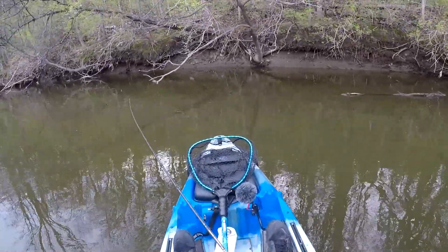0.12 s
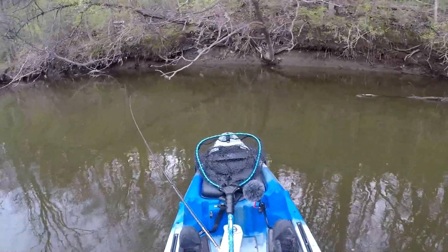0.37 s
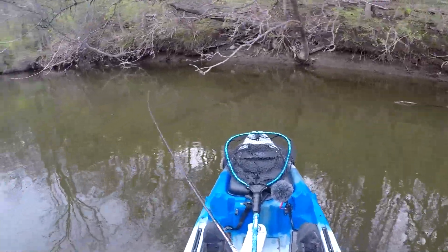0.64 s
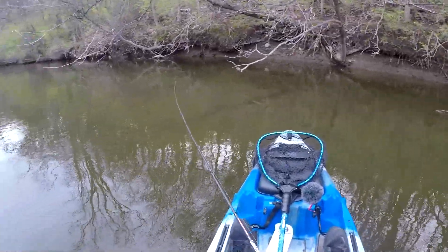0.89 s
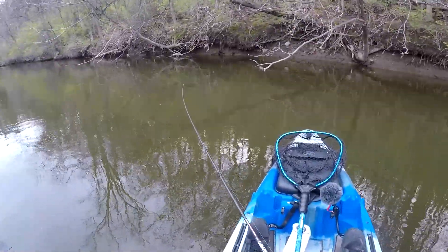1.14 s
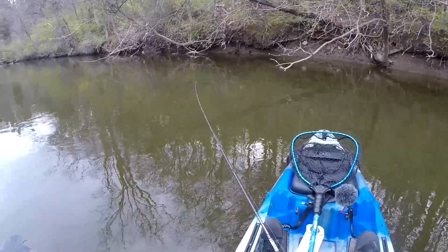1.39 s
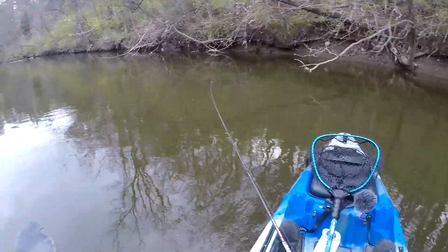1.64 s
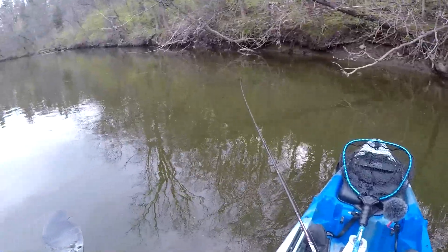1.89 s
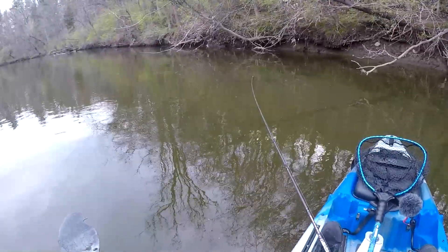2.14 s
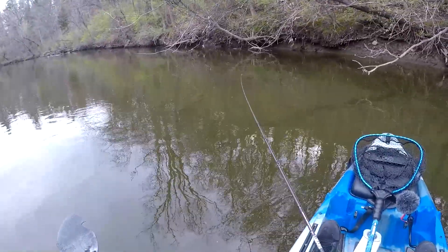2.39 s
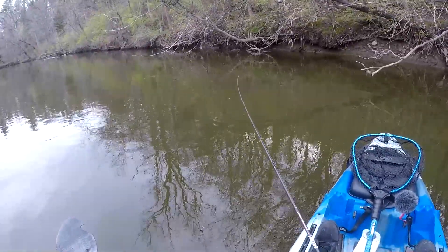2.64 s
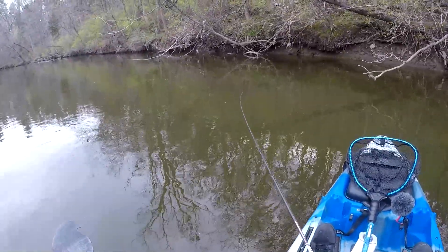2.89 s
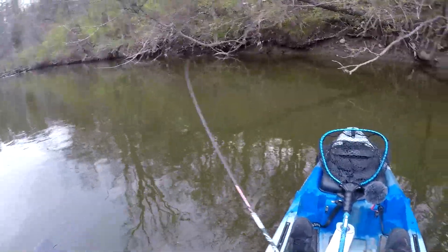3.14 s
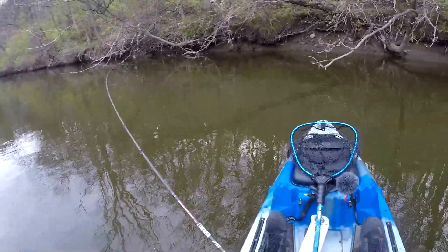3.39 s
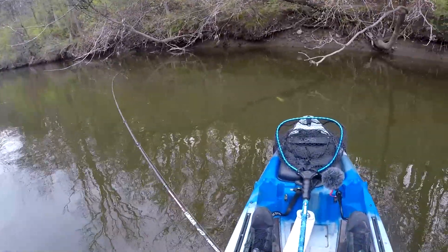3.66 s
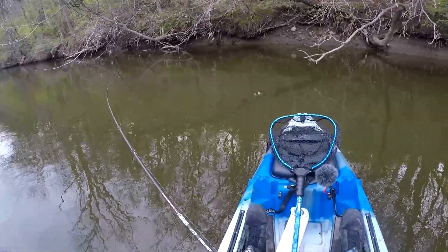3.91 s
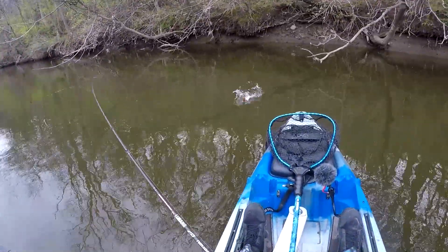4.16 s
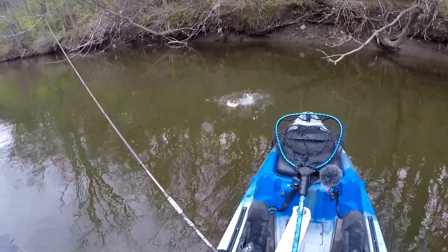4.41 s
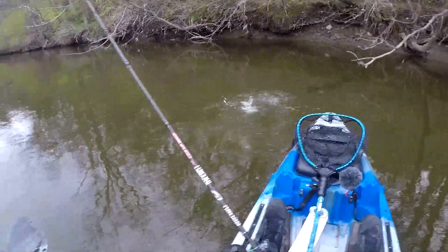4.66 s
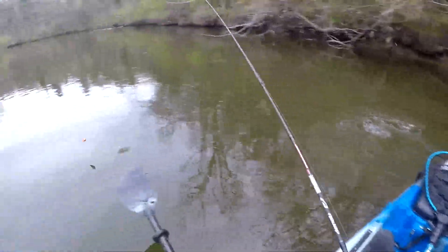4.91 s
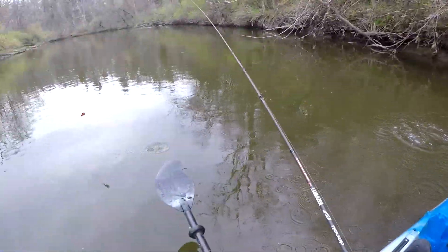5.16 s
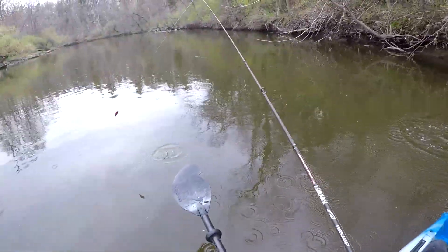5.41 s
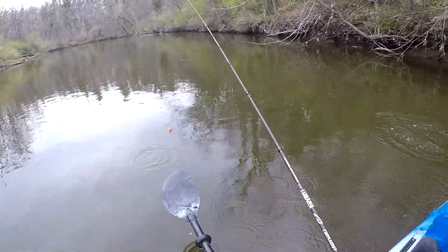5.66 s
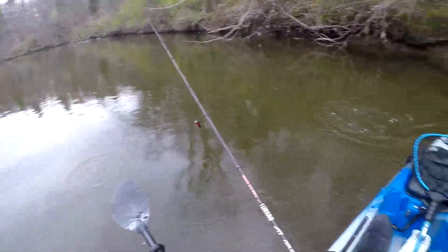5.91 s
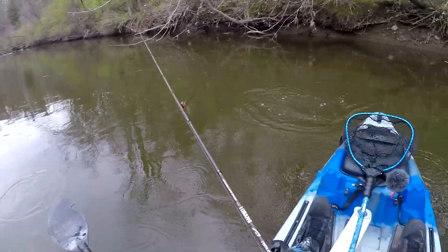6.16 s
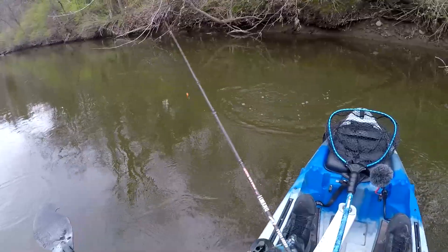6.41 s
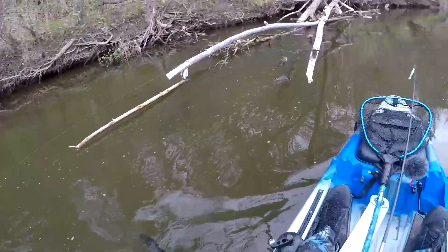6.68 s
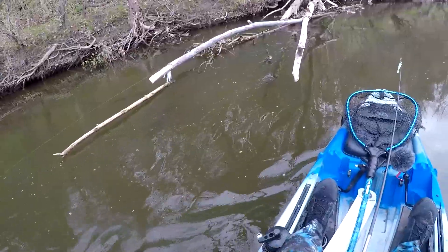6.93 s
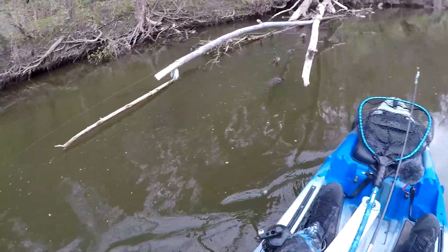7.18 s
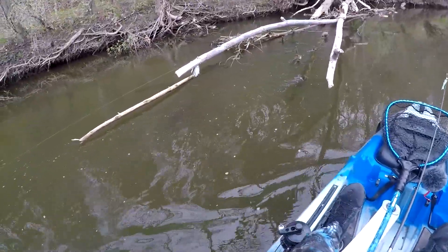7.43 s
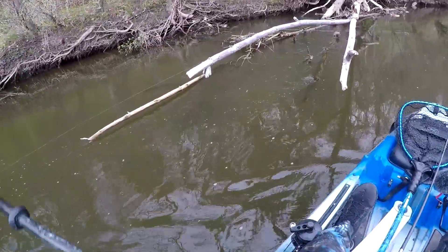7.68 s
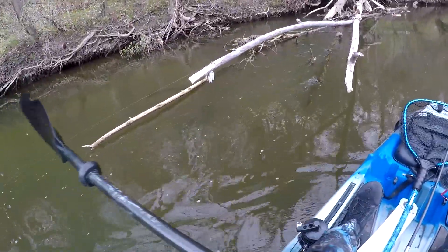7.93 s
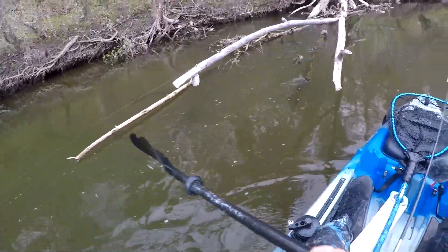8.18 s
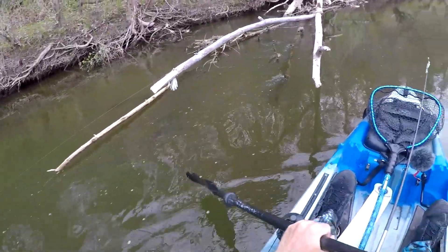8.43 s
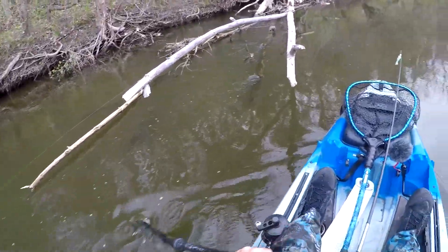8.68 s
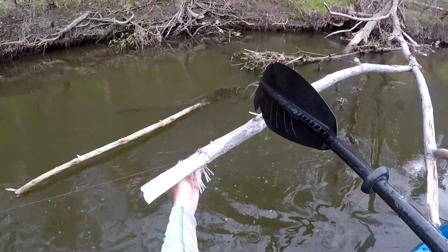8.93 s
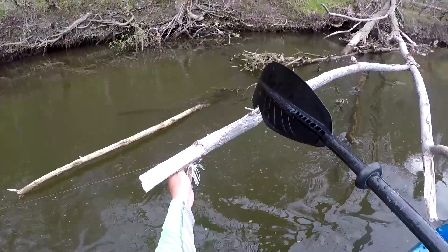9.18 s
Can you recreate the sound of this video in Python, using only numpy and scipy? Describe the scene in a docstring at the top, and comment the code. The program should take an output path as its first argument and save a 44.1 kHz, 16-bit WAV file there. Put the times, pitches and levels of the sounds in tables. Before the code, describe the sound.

Faint birds and far traffic over still water, a light splash, then an abrupt change to close plastic kayak thumps, bubbling slosh and low rumbling.

```python
"""Far traffic rumble, river hiss, faint frogs and songbirds: shaped noise and swept sines with an echo of trees.
A plastic kayak drifts; dull knocks ring its hull as decaying modes, and a fish splashes at the end of a line.
Then the hull rocks, judders along a sunken branch and sloshes under the paddle, right below the microphone.
Water is swarms of rising bubble tones, flaring bands of hiss and short noise bursts for drops."""
import sys
import numpy as np
from scipy import signal
from scipy.fft import rfft, irfft, next_fast_len
from scipy.io import wavfile
from scipy.ndimage import uniform_filter1d

SR = 44100
rng = np.random.default_rng(int(sys.argv[2]) if len(sys.argv) > 2 else 0)


def generate_wav(signal):
    """Clip the signal to [-1, 1] and save it as 16-bit WAV at the path in sys.argv[1]."""
    frames = np.transpose(np.atleast_2d(signal))
    scaled = np.clip(frames, -1, 1) * 32767
    pcm = np.round(scaled).astype(np.int16)
    wavfile.write(sys.argv[1], SR, pcm)


def to_linear_factor(level_db):
    """Convert decibel levels (scalar or array-like) to linear amplitude factors."""
    exponent = np.asarray(level_db, float) / 20
    return 10 ** exponent


N = 410571
T = np.arange(N) / SR
OPPOSITE = np.array([[1], [-1]])  # side signal into left and right


def unit_rms(x):
    """Scale to rms 1."""
    return x / np.sqrt(np.mean(x ** 2))


def band(x, lo_hz, hi_hz, order=2):
    """Band-pass, scaled to rms 1."""
    sos = signal.butter(order, [lo_hz, min(hi_hz, .45 * SR)], "bandpass", fs=SR, output="sos")
    return unit_rms(signal.sosfilt(sos, x))


def coloured_noise(hz, db):
    """Noise with its spectrum drawn through (Hz, dB) points on a log frequency axis."""
    n = next_fast_len(N)
    f = np.maximum(np.arange(n // 2 + 1) * SR / n, 1)
    gain = to_linear_factor(np.interp(np.log(f), np.log(hz), db))
    return irfft(rfft(rng.standard_normal(n)) * gain, n)[:N]


def walk(rate_hz):
    """Random levels held 1 / rate_hz s and slewed twice; rms 1."""
    k = int(SR / rate_hz)
    held = np.repeat(rng.standard_normal(N // k + 1), k)
    return unit_rms(uniform_filter1d(uniform_filter1d(held, k), k)[:N])


def add(out, s, x):
    """Mix x into out from time s."""
    i = int(s * SR)
    out[i:i + len(x)] += x[:N - i]


def sine(hz):
    """Sine along a pitch track."""
    return np.sin(2 * np.pi * np.cumsum(hz) / SR)


def bubble(hz, cycles, rise_octaves):
    """A shrinking air pocket: quick swell, slower fade, pitch rising; envelope peak 1."""
    u = np.arange(int(1.5 * cycles / hz * SR)) * hz / cycles / SR
    return 5 * u * np.exp(1 - 5 * u) * sine(hz * 2 ** (rise_octaves * u))


# Far traffic and river air. Each row: time in s, level in dB, treble lift in dB.
AIR_LEVELS = [(0, -50, 2.5), (.4, -49.5, 3.5), (1.9, -49.5, 2.5), (2.15, -44, 1.5), (3.4, -43, 3.5),
              (5, -45, 2.5), (6.599, -44, 2.5), (8.3, -51.5, 10), (9.31, -53.5, 9.5)]
# Spectrum of the air. Each row: frequency in Hz, density in relative dB per Hz.
AIR_SPECTRUM = [(6, -6), (12, 2.5), (65, -8), (90, -9.5), (117, -5), (160, -9.5), (215, -7), (300, -18),
                (500, -21), (950, -22.5), (1300, -31), (2200, -34.5), (5000, -42.5), (15500, -48)]
# Stereo width of the air. Each row: frequency in Hz, side minus mid in dB.
AIR_WIDTH = [(60, -30), (500, -19), (1300, -12), (2400, -5), (15000, -3.5)]
# Far frogs. One row: centre in Hz, width in Hz, mean level in dB.
FROGS = (1750, 63, -72.5)


def air():
    """Traffic rumble and hiss, alike in both ports in the bass, less so in the treble; a faint band of frogs."""
    hz, db = np.transpose(AIR_SPECTRUM)
    side_hz, side_db = np.transpose(AIR_WIDTH)
    s, level_db, lift_db = np.transpose(AIR_LEVELS)
    mid = coloured_noise(hz, db)
    side = coloured_noise(hz, db + np.interp(np.log(hz), np.log(side_hz), side_db))
    both = (mid + side * OPPOSITE) / np.std(mid)
    treble = signal.sosfilt(signal.butter(1, 2500, "highpass", fs=SR, output="sos"), both)
    both = both + (to_linear_factor(np.interp(T, s, lift_db)) - 1) * treble
    frog_hz, width_hz, frog_db = FROGS
    frogs = band(rng.standard_normal(N), frog_hz - width_hz / 2, frog_hz + width_hz / 2)
    frogs = frogs * to_linear_factor(frog_db + 0.7 * walk(13))
    return to_linear_factor(np.interp(T, s, level_db) + 0.92 * walk(5.35)) * both + frogs


def add_tone(out, s, t, hz, gain):
    """A sine of rms gain on a pitch track, with 2.9 ms edges."""
    edge = np.clip(np.minimum(t, t[-1] - t) / 0.0029, 0, 1)
    add(out, s, np.sqrt(2) * edge * gain * sine(hz))


# Short glides. Each row: start in s, length in s, from Hz, to Hz, rms level at the top of the swell in dB.
GLIDES = [(.02, 0.048, 2160, 2060, -66.5), (0.002, 0.036, 3460, 3460, -72), (0.482, 0.059, 3020, 2880, -62),
          (0.561, .042, 2800, 2230, -63), (2.493, 0.019, 2990, 3420, -58.5),
          (2.877, 0.02, 3120, 3360, -54.5), (3.215, 0.028, 3090, 3470, -56.5),
          (4.414, .03, 8040, 4800, -55.5), (5.215, 0.036, 8200, 4700, -52.5), (5.255, .01, 5700, 8950, -58),
          (6.228, 0.035, 2920, 2960, -60.5), (7.075, 0.021, 4250, 3970, -48)]


def chips():
    """Short sines gliding in a straight line under one rounded swell."""
    out = np.zeros(N)
    for s, length_s, from_hz, to_hz, db in GLIDES:
        t = T[:int(length_s * SR)]
        hz = from_hz + (to_hz - from_hz) * t / length_s
        add_tone(out, s, t, hz, to_linear_factor(db) * np.sin(np.pi * t / length_s) ** 0.45)
    return out


# Held notes. Each row: start in s, length before release in s, pitch in Hz, slide in Hz,
# rms level in dB, flutter depth in dB.
HELD = [(0.099, 0.14, 3535, -16, -72.5, 1), (0.108, 0.17, 2600, -7, -68, 14),
        (.64, 0.13, 2930, -10, -77, 3), (2.525, 0.14, 5800, -26, -61.5, 18),
        (2.904, 0.092, 5725, 25, -51, 10), (3.245, 0.057, 5665, -17.5, -51.5, 6),
        (3.41, .12, 5670, 6, -65.5, 12), (3.405, 0.16, 3970, -90, -63.5, 0),
        (3.78, 0.14, 3440, -12, -66.5, 0), (3.978, 0.17, 3470, 39, -62, 1),
        (4.809, 0.17, 6680, -45, -54.5, 7), (8.028, 0.07, 4020, -57, -60, -0.5)]
RELEASE_S, RELEASE_DB, FLUTTER_HZ = 0.11, 28, 36


def held_notes():
    """Sines that slide a little, flutter in level and let go."""
    out = np.zeros(N)
    for s, length_s, hz, slide_hz, db, flutter_db in HELD:
        t = T[:int((length_s + RELEASE_S) * SR)]
        flutter = flutter_db * np.sin(np.pi * FLUTTER_HZ * t) ** 2
        release = RELEASE_DB * np.maximum(t - length_s, 0) / RELEASE_S
        pitch_hz = hz + slide_hz * np.minimum(t / length_s, 1)
        add_tone(out, s, t, pitch_hz, to_linear_factor(db - flutter - release))
    return out


# Trills, buzzes and one rough, fading echo smear round 2.6 kHz. Each row: first note in s, end in s,
# notes per s, mid pitch in Hz, sweep in Hz per note, peak level in dB, roughness from 0 to 1.
TRILL_RUNS = [(3.506, 4.2, 21.05, 4870, -600, -51, 0.03), (5.122, 5.185, 92, 4200, -1900, -43.5, 0.9),
              (4.128, 4.34, 60.5, 3980, 800, -45.5, 0.03), (5.301, 5.56, 56, 3240, 450, -49.5, 0.03),
              (4.919, 5.074, 30, 7100, 200, -53, 0.25), (5.745, 5.98, 195, 5320, 200, -54, 0.26),
              (0.551, 1.1, 160, 2610, 102, -62.5, 0.29), (1.28, 1.5, 120, 7300, 300, -67.5, .5)]


def trills():
    """Runs of swept sine notes, one of them an echo smear; roughness scatters the pitch from cycle to cycle."""
    out = np.zeros(N)
    jitter_hz = 600 * walk(1500)
    for s0, s1, notes_per_s, mid_hz, sweep_hz, db, rough in TRILL_RUNS:
        t = T[:int((s1 - s0) * SR)]
        sung = min(.6, 0.015 * notes_per_s)  # share of each beat that sounds
        u = np.minimum(t * notes_per_s % 1 / sung, 1)
        swell = np.sin(np.pi * np.clip(0.092 + (t / t[-1]) ** 0.64, 0, 1))  # loudest early, then fading
        hz = mid_hz + sweep_hz * (u - .5) + rough * jitter_hz[int(s0 * SR):][:len(t)]
        add(out, s0, to_linear_factor(db) * swell * np.sin(np.pi * u) * sine(hz))
    return out


# Slurs. Each row: start in s, length in s, from Hz, top in Hz, first rms level in dB, last rms level in dB.
SLURRED_NOTES = [(2.498, 0.43, 6250, 7180, -69, -59.5), (7.049, 0.052, 5030, 6960, -51, -77),
                 (8.004, .05, 5000, 6950, -56, -76)]
CLIMB_SHARE = .15  # of the length, to climb two thirds
DROOP_SHARE, DROOP_POWER = .07, 30  # pitch lost at the very end, and how late


def slurs():
    """Sines that climb to a top and bend over."""
    out = np.zeros(N)
    for s, length_s, from_hz, top_hz, first_db, last_db in SLURRED_NOTES:
        t = T[:int(length_s * SR)]
        u = t / length_s
        hz = top_hz * (1 - DROOP_SHARE * u ** DROOP_POWER) - (top_hz - from_hz) * np.exp(-u / CLIMB_SHARE)
        add_tone(out, s, t, hz, to_linear_factor(first_db + (last_db - first_db) * u))
    return out


WOODS_T60_S, WOODS_DB = 0.7, -5


def birds():
    """All the song, wavering in level, with a decaying-noise smear of echo from the trees."""
    song = chips() + held_notes() + trills() + slurs()
    t = T[:SR // 2]
    tail = rng.standard_normal((2, len(t))) * 1000. ** (-t / WOODS_T60_S) * np.minimum(t / 0.0085, 1)
    tail = tail[0] + 0.061 * tail[1] * OPPOSITE
    tail *= to_linear_factor(WOODS_DB) / np.sqrt(np.sum(tail[0] ** 2))
    echo = signal.fftconvolve(song[None], tail, axes=1)[:, :N]
    return song * to_linear_factor(2.4 * walk(90)) + echo


# Modes of the shell. Each row: mean pitch in Hz, mean level in relative dB, t60 in s.
HULL_MODES = [(321, 2.5, 0.049), (405.4, 1.5, 0.04), (530, 0.5, 0.023), (703, 3, 0.018), (993, -4.5, 0.03),
              (1350, -0.5, 0.0089), (2300, -25.5, 0.012)]
# Single blows on the hull. Each row: time in s, ring peak in dB, hardness in dB per octave.
BLOWS = [(0.141, -34, -1.5), (1.956, -35.5, 4.5), (2.128, -30.5, 5), (2.949, -23, 1.5), (3.813, -23.5, 0),
         (6.715, -20, 1.5), (6.829, -20.5, 7.5), (7.099, -31, 0), (7.241, -23.5, 2.5), (7.296, -29, 10),
         (8.408, -31, -1.5), (8.678, -20, 0), (8.822, -30, 4), (8.877, -24, -7), (9.156, -32, 1.5),
         (9.189, -31.5, -3)]
# The hull sticks and slips along the branch. Each row: first slip peak in dB, fading in dB per s,
# hardness in dB per octave, lag scale of the low modes in s, list of slip times in s.
STICK_SLIPS = [(-23.5, 6.5, 0.5, 0.0035, [7.327, 7.369, 7.417, 7.468, 7.511, 7.562, 7.627, 7.683, 7.723, 7.759, 7.797, 7.844, 7.898]),
               (-25.5, 14, -1, 0.0042, [8.427, 8.452, 8.481, 8.507, 8.532, 8.561, 8.592, 8.629])]
BLOW_LAG_S = .002  # bending waves carry the low modes slowest
CRACK_DB, CRACK_T60_S = -23.5, 0.034  # dry scrape at each contact


def knocks():
    """Each contact rings the shell's modes, highest first; harder contact lifts the upper modes."""
    out, t = np.zeros(N), T[:SR // 10]
    hz, db, t60_s = np.transpose(HULL_MODES)[:, :, None]
    blows = [(*row, BLOW_LAG_S) for row in BLOWS]
    for first_db, fade_db_per_s, hard_db, lag_s, slips in STICK_SLIPS:
        blows += [(s, first_db - fade_db_per_s * (s - slips[0]), hard_db, lag_s) for s in slips]
    scrapes = band(rng.standard_normal((len(blows), len(t))), 660, 4800)
    for (s, peak_db, hard_db, lag_s), scrape in zip(blows, scrapes):
        level_chance, pitch_chance = rng.standard_normal((2, len(hz), 1))
        late = np.maximum(t - lag_s * (hz[0] / hz - hz[0] / hz[-1]), 0)
        gain = to_linear_factor(db + 2.0 * level_chance + hard_db * np.log2(hz / hz[0]))
        modes = gain * np.sin(2 * np.pi * hz * (1 + 0.04 * pitch_chance) * late)
        attack = np.minimum(late / (0.32 * lag_s), 1)
        ring = np.sum(modes * 1000. ** (-late / t60_s) * attack, axis=0)
        crack = scrape * 1000. ** (-t / CRACK_T60_S) * np.minimum(t / 0.001, 1)
        add(out, s, to_linear_factor(peak_db) * (ring / np.abs(ring).max() + to_linear_factor(CRACK_DB) * crack))
    return out


# Drops, spray and one bright click at 8.894 s. Each row: time in s, peak in dB, centre in Hz.
DROPS_AND_CLICK = [(2.338, -44, 6670), (2.8845, -36, 3520), (3.9115, -36, 2330), (4.04, -40, 1480),
                   (4.091, -41, 2390), (4.105, -37, 6500), (4.166, -29, 13500), (4.2334, -36, 4130),
                   (4.284, -40, 2300), (4.292, -40, 5370), (4.312, -38, 1670), (4.495, -42.5, 3900),
                   (4.579, -30.5, 12000), (4.589, -30.5, 12600), (4.619, -25.5, 6900), (4.628, -33, 10500),
                   (4.6416, -32, 2700), (4.6811, -29, 6750), (4.7246, -42.5, 11200), (5.0007, -36.5, 2200),
                   (5.013, -38, 10900), (6.8916, -33, 3950), (6.905, -42, 5170), (6.9437, -29.5, 5800),
                   (7.164, -27, 2730), (7.2, -36, 3930), (7.296, -40, 8900), (7.806, -43, 4340),
                   (8.146, -38.5, 9300), (8.237, -44, 5900), (8.264, -39.5, 3420), (8.2904, -41, 8800),
                   (8.303, -45, 7600), (8.3724, -45, 8210), (8.444, -42, 8000), (8.475, -36, 5400),
                   (8.483, -32, 2530), (8.709, -45, 8000), (8.752, -41, 7500), (8.8628, -34, 8750),
                   (8.894, -30.5, 6900), (8.938, -42.5, 3030), (9.0336, -44, 3700), (9.0947, -38, 7340)]


def drops():
    """Each drop, and the one bright click, is a tick inside a short hiss round its own pitch."""
    out, t = np.zeros(N), T[:SR // 30]
    u = (t - .008) / 0.0048
    u = u * (1 + .5 * (u < 0))  # rises a little faster than it fades
    for s, db, hz in DROPS_AND_CLICK:
        noise = rng.standard_normal(len(t))
        narrow, wide = band(noise, 0.875 * hz, 1.164 * hz), band(noise, 0.49 * hz, 2.05 * hz)
        hiss = (narrow + .5 * wide) * np.exp(-u ** 2)
        tick = wide * np.exp(-(u / 0.16) ** 2)
        burst = hiss + tick
        add(out, s - .007, to_linear_factor(db) * burst / np.abs(burst).max())
    return out


def grains(per_s, lo_hz, octaves, cycles, tilt):
    """A random swarm of bubbles: many small, few large, the high ones weaker."""
    out = np.zeros(N)
    swarm = rng.random((int(per_s * T[-1]), 4)) * [T[-1], 1, 1, 1]
    times = swarm[:, 0]
    wet = np.any([(times > rows[0][0]) & (times < rows[-1][0]) for rows in PASSAGES], axis=0)
    for s, size, pitch, length in swarm[wet]:  # only while water moves
        gain = (1 - .98 * size) ** -.45 * 2 ** (-tilt * pitch)
        add(out, s, gain * bubble(lo_hz * 2 ** (octaves * pitch), cycles * (0.48 + length), 0.34))
    return unit_rms(out)


def splats(lo_hz, octaves, rate_hz, patchy_db):
    """Torn water: narrow bands of hiss that flare in short bursts, partly together, partly alone."""
    out, together = np.zeros(N), walk(rate_hz)
    for hz in lo_hz * 2 ** np.linspace(0, octaves, num=5):
        flare = np.maximum(0.49 * together + 0.65 * walk(1.5 * rate_hz), -.6)
        hiss = band(rng.standard_normal(N), hz / 1.19, hz * 1.37)
        out += hiss * to_linear_factor(patchy_db * flare) * (lo_hz / hz) ** 0.25
    return unit_rms(out)


# Water sloshing, one passage each for the fish, the paddle and the drips after.
# Each row of a passage: time in s, gurgle in dB, wash in dB.
PASSAGES = [
    [(3.85, -82, -65), (4.05, -62.5, -62), (4.2, -71, -57), (4.32, -59, -58.5), (4.5, -66, -70),
     (4.65, -64, -57.5), (4.8, -60, -73)],
    [(6.712, -47, -49.5), (6.8, -52.5, -49.5), (6.95, -52, -52.5), (7.0, -31, -47.5), (7.07, -42.5, -51),
     (7.15, -31.5, -45), (7.2, -44, -47.5), (7.32, -40.5, -50.5), (7.62, -47, -60), (7.69, -52, -64),
     (7.9, -50, -73), (8.05, -70, -63.5), (8.4, -59, -66.5), (8.72, -51, -46), (8.8, -48, -47.5),
     (8.897, -34.5, -38)],
    [(8.9, -72, -79), (9.15, -57.5, -60), (9.25, -58, -89)],
]
# Spray over wash. One value per passage, in dB.
SPRAY_OVER_WASH_DB = [1.5, -8.5, -8]


def slosh():
    """Gurgling bubbles low down, a ragged wash of small ones above, and fizzing spray on top."""
    gurgle = unit_rms(grains(300, 298.3, 2.247, 6.2, 0.27) + 0.5 * splats(328, 2.1, 45, 6.1))
    wash = unit_rms(grains(600, 1013, 2.2, 8.3, 0.3) + 0.94 * splats(1370, 1.06, 80, 7.6))
    spray = unit_rms(grains(300, 3580, 1.69, 9, 0.37) + 1.64 * splats(3680, 1.34, 90, 6.8))
    out = np.zeros(N)
    for rows, spray_db in zip(PASSAGES, SPRAY_OVER_WASH_DB):
        s, gurgle_db, wash_db = np.transpose(rows)
        for x, db in [(gurgle, gurgle_db), (wash, wash_db), (spray, wash_db + spray_db)]:
            out += x * to_linear_factor(np.interp(T, s, db, left=-120, right=-120))
    return out


# Small drops falling at random. Each row: from s, to s, drops per s, base peak in dB before the tremble.
DROP_SHOWERS = [(3.951, 4.451, 170, -57), (4.623, 4.804, 33, -59), (6.717, 7.398, 77, -47.5),
                (7.396, 7.902, 36, -58.5), (8.6, 8.891, 150, -42)]
SHOWER_LOW_HZ, SHOWER_OCTAVES, SHOWER_CYCLES = 915, 2.88, 9.1
HIGH_DROPS_DB = -12  # the highest blips against the lowest


def showers():
    """Small drops, each a brief blip at its own pitch."""
    out = np.zeros(N)
    for s0, s1, per_s, db in DROP_SHOWERS:
        for when, size, pitch, length in rng.random((int(per_s * (s1 - s0)), 4)):
            hz = SHOWER_LOW_HZ * 2 ** (SHOWER_OCTAVES * pitch)
            blip = bubble(hz, SHOWER_CYCLES * (0.28 + length), 0.19)
            blip_db = db + HIGH_DROPS_DB * pitch - np.log(1 - .95 * size)  # a few are louder
            add(out, s0 + (s1 - s0) * when, to_linear_factor(blip_db) * blip)
    return out


# Bubbles, plops, one long steady low ring of the hull at 266 Hz and one short low click at 8.894 s.
# Each row: start in s, peak in dB before the tremble, first pitch in Hz,
# length in cycles of that pitch, rise in octaves per such length.
BUBBLES_RING_AND_CLICK = [(4.099, -40, 710, 14, 0), (4.142, -31, 733, 14, 0), (4.17, -39, 684, 24, 0.03),
                          (4.04, -43, 716, 12, 0.091), (4.088, -49, 2300, 40, 0), (4.276, -47, 2300, 34, 0),
                          (4.336, -37, 810, 10, 0.44), (4.357, -34, 910, 4.3, 0),
                          (4.425, -48, 686, 12, 0.1), (4.464, -43.5, 756, 28, 0),
                          (4.461, -41.5, 970, 10, 0.15), (4.517, -42, 720, 14, 0.091),
                          (4.586, -32, 1050, 4.3, 0), (6.837, -33.5, 486, 29, 0.67),
                          (6.972, -28.5, 805, 11, 0.18), (6.983, -15, 551, 14.8, 0.74),
                          (6.985, -21, 855, 9.1, 0.023), (7.005, -29, 974, 36, 0.066),
                          (7.1, -32, 624, 5, 0.43), (7.125, -29, 433, 6.5, 0.65),
                          (7.134, -26, 805, 6.4, 0.25), (7.146, -25, 384, 6.7, 0.62),
                          (7.148, -31.5, 1620, 13, 0.48), (7.238, -24, 760, 16, 0.95),
                          (7.89, -44, 266, 125, 0), (8.028, -43.5, 640, 34, 1),
                          (8.219, -46.5, 1250, 14.5, 0.26), (8.288, -42, 1450, 8.9, 0.017),
                          (8.468, -27, 2130, 15, 0.24), (8.601, -30.5, 2090, 16, 0.22),
                          (8.619, -30, 1490, 11, 0.091), (8.667, -28.5, 1950, 14, 0.4),
                          (8.73, -31.5, 2330, 14, 0.11), (8.765, -41, 1020, 31, 0),
                          (8.894, -22, 600, 1.4, 0)]


def bubbles():
    """Single bubbles and plops; a steady hull ring and a short low click share their swell and fade."""
    out = np.zeros(N)
    for s, db, hz, cycles, rise_octaves in BUBBLES_RING_AND_CLICK:
        add(out, s, to_linear_factor(db) * bubble(hz, cycles, rise_octaves))
    return out


def trembling_water():
    """Bubbles and showers, with a quick random tremble in level throughout."""
    return (bubbles() + showers()) * (1 + 0.34 * walk(250))


# The hull rocking under the microphone. Each row: time in s, slow heave in dB, quick shake in dB.
ROCKING_LEVELS = [(6.701, -15, -37), (6.9, -24, -44), (7.25, -21, -37.5), (7.55, -25, -33.5),
                  (7.85, -23.5, -27.5), (8.051, -22, -41), (8.35, -33.5, -46), (8.5, -20, -27.5),
                  (8.65, -24.5, -44), (8.92, -22, -29), (9.31, -20, -26.5)]


def rocking():
    """Slow pressure heaves through the shell, with a quicker shake above them."""
    s, heave_db, shake_db = np.transpose(ROCKING_LEVELS)
    out = np.zeros(N)
    for db, lo_hz, hi_hz in [(heave_db, 5, 21.1), (shake_db, 26, 67.6)]:
        swing = band(rng.standard_normal(N), lo_hz, hi_hz, order=3)
        # a rocking hull swings at an even size; only its timing wanders
        power = uniform_filter1d(uniform_filter1d(swing ** 2, size=3000), size=3000)
        swing = unit_rms(swing / np.sqrt(power + 0.33))
        out += to_linear_factor(np.interp(T, s, db)) * swing
    # the shake also drums faintly in the hollow hull
    drum_db = 0.59 * np.interp(T, s, shake_db) - 26.5
    out += to_linear_factor(drum_db) * band(rng.standard_normal(N), 62, 193)
    return out * np.clip((T - s[0]) / 0.041, 0, 1)


def scene():
    """Near sounds sit in the middle; a little of their treble differs between the ports."""
    near = knocks() + drops() + slosh() + trembling_water() + rocking()
    apart = 0.033 * np.diff(np.roll(near, 40), prepend=0)
    return near + apart * OPPOSITE + birds() + air()


def band_limit(x):
    """A steep low-pass at the top of the band."""
    return signal.sosfilt(signal.butter(12, 16660, fs=SR, output="sos"), x)


def record(dry):
    """A steep low-pass cuts the top at 15750 Hz."""
    low_pass = signal.ellip(8, .2, 70, 15750, fs=SR, output="sos")
    mix = signal.sosfilt(low_pass, dry)
    return band_limit(mix)


dry = scene()
out = record(dry)
generate_wav(out)
```